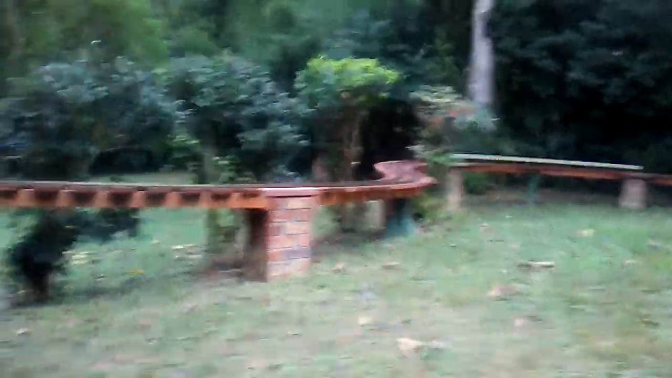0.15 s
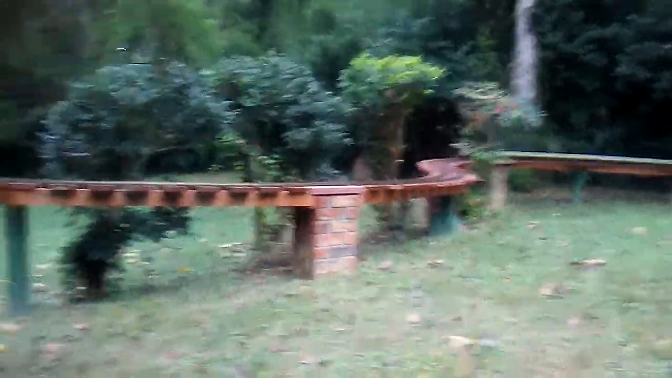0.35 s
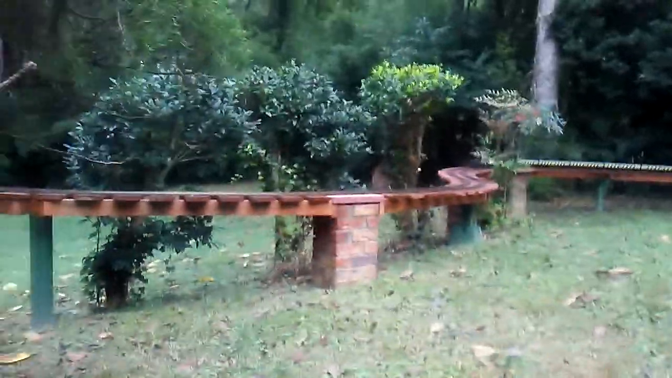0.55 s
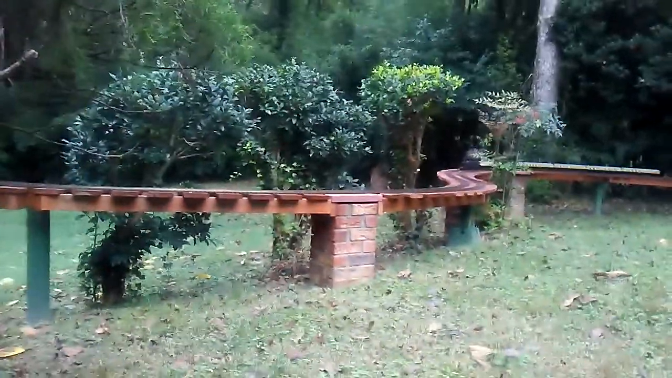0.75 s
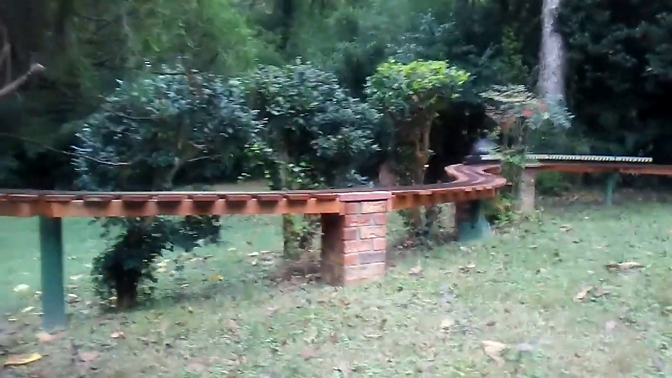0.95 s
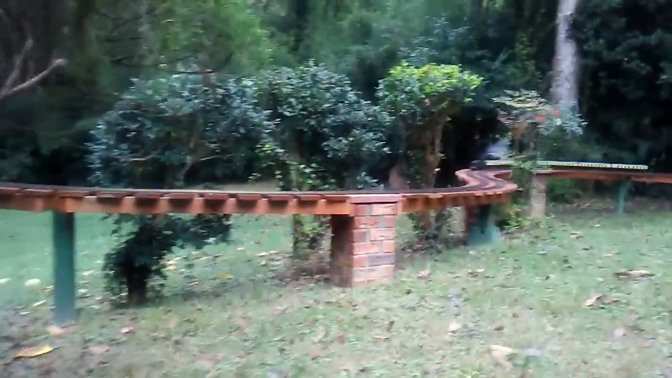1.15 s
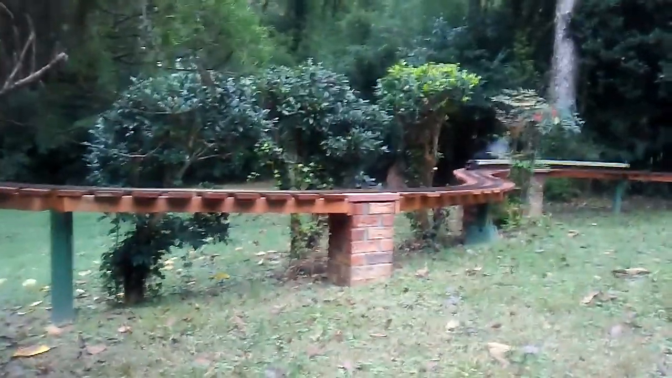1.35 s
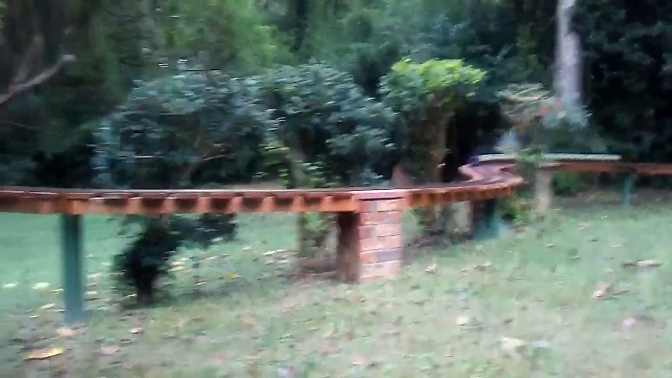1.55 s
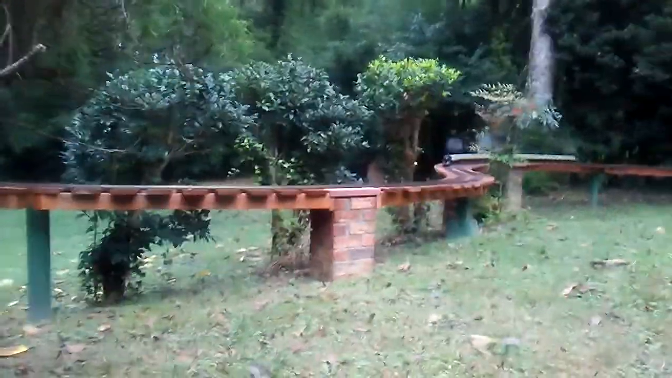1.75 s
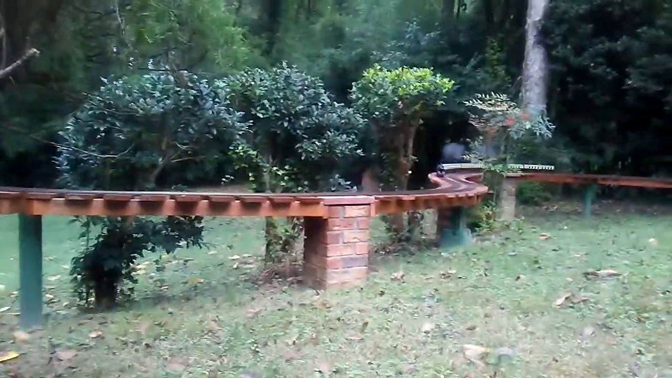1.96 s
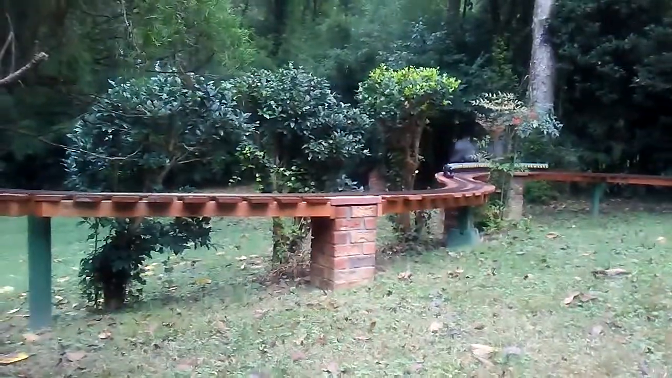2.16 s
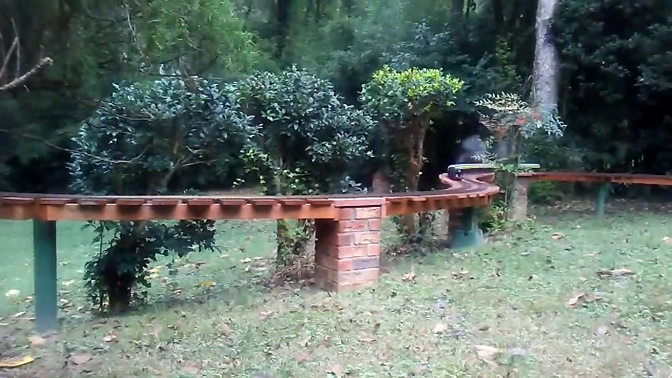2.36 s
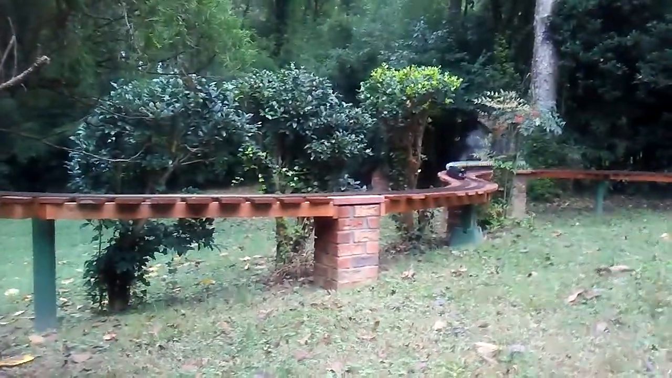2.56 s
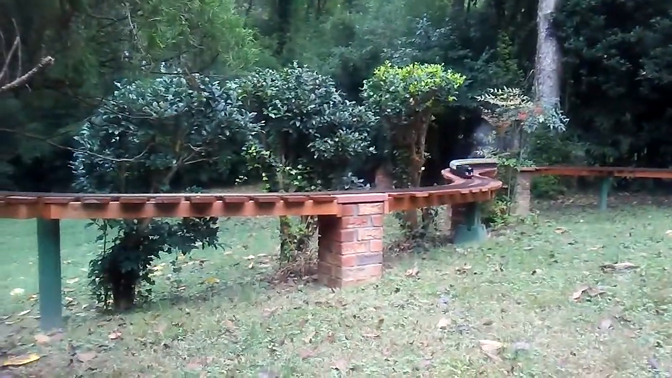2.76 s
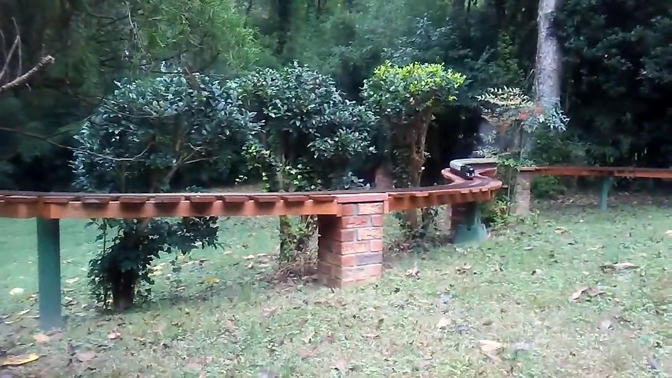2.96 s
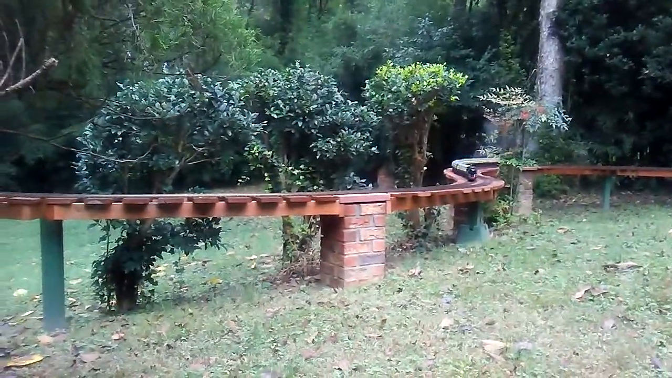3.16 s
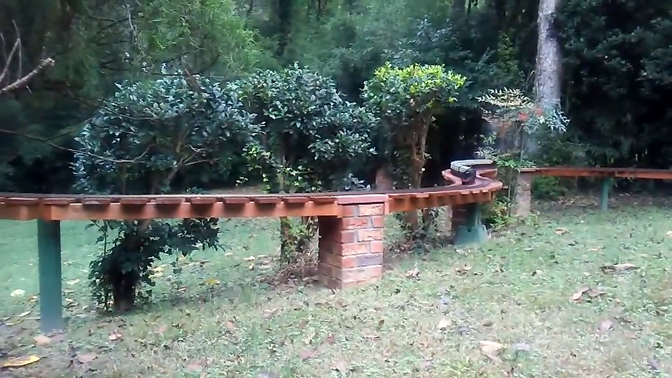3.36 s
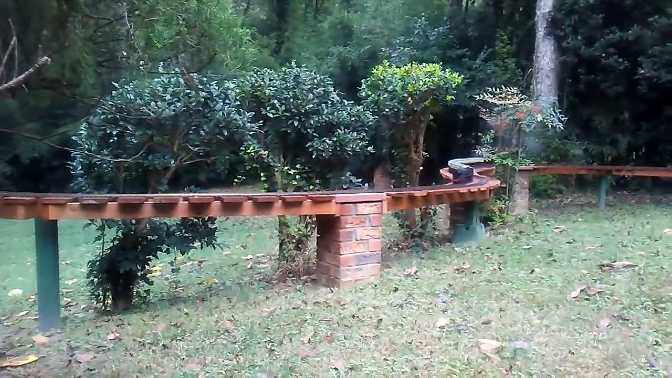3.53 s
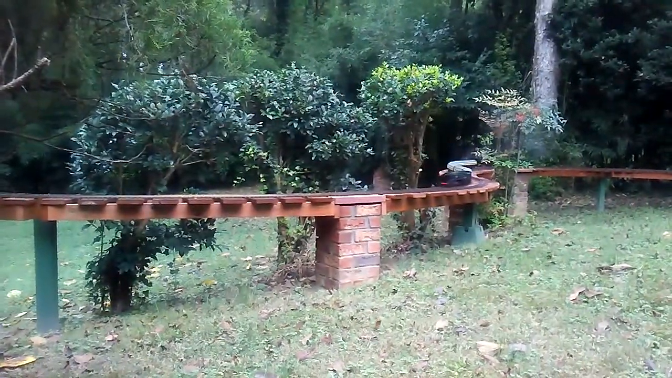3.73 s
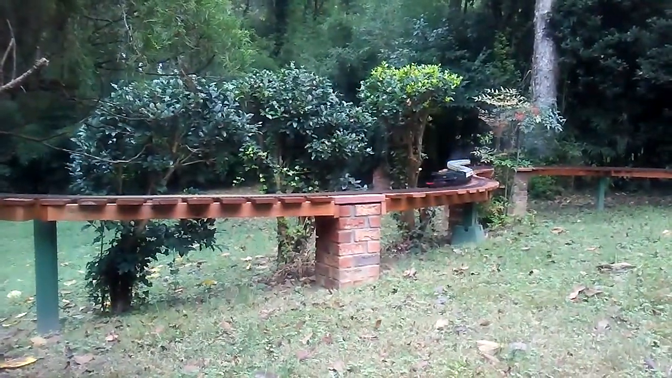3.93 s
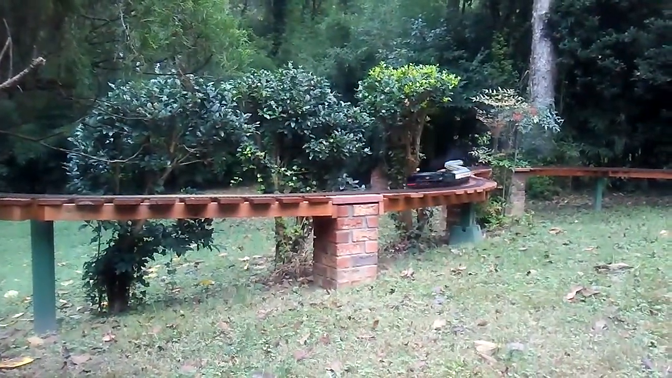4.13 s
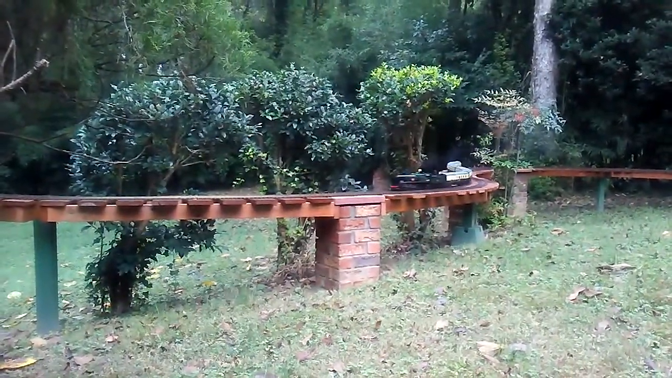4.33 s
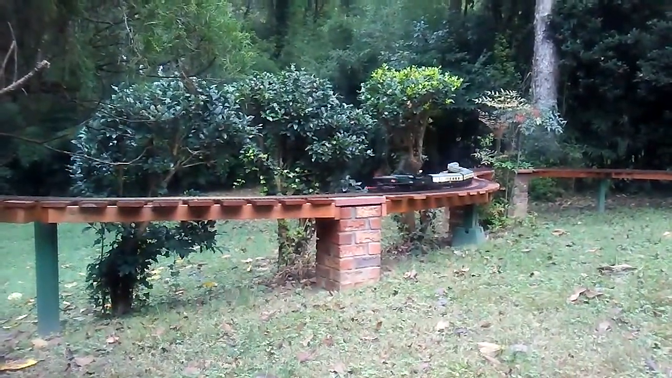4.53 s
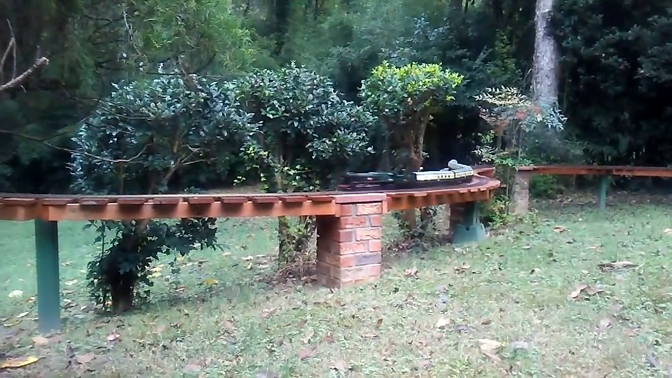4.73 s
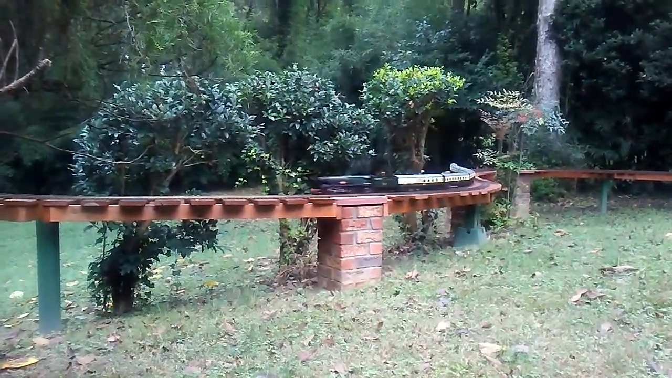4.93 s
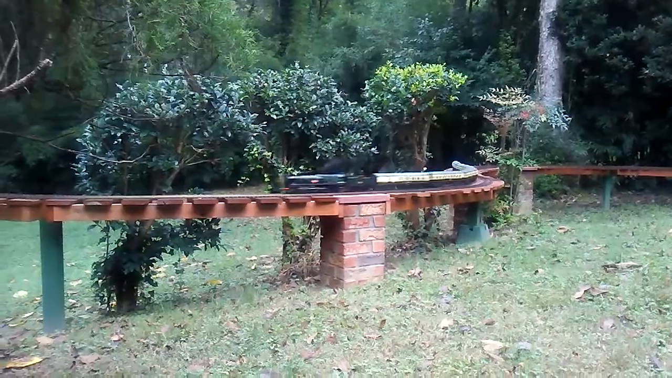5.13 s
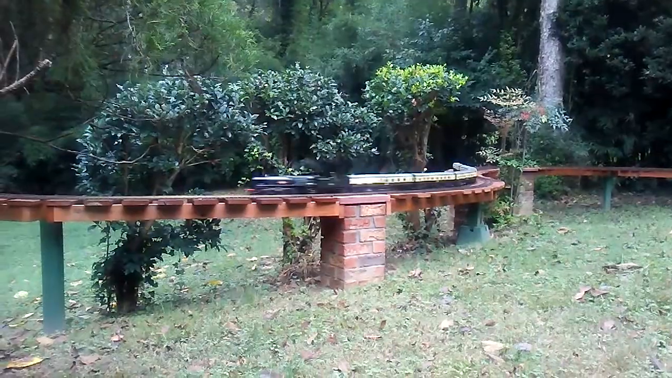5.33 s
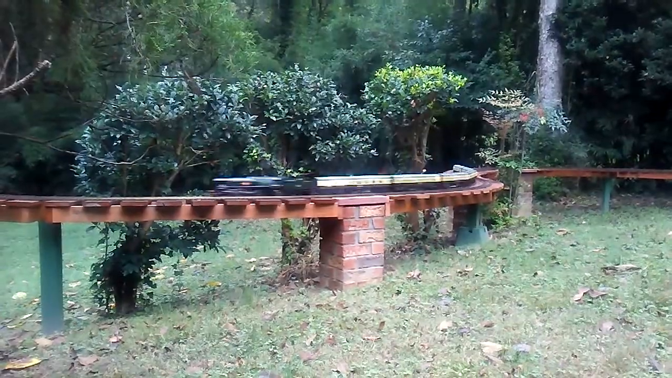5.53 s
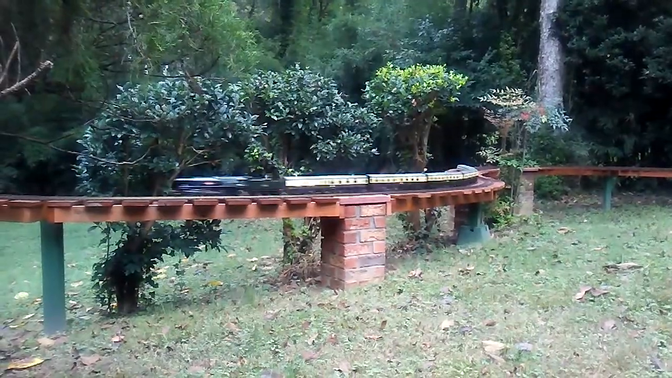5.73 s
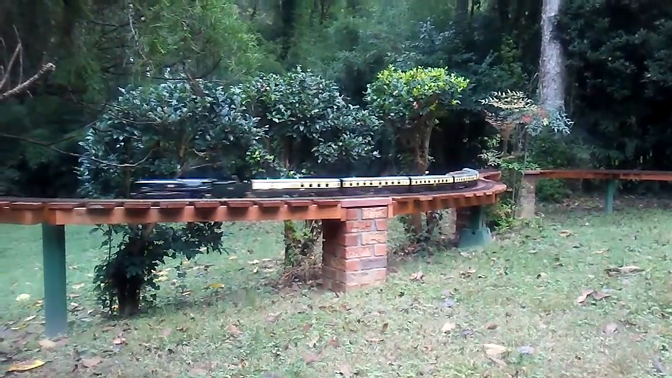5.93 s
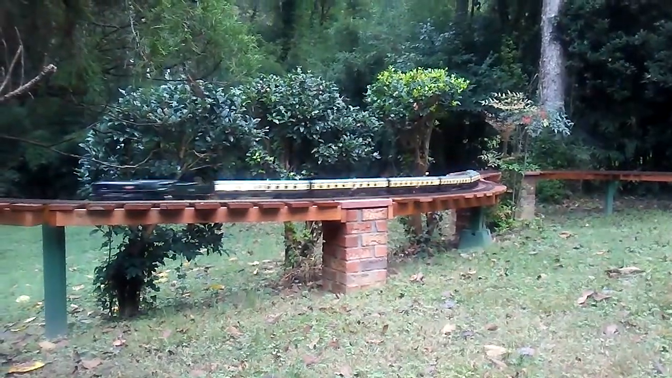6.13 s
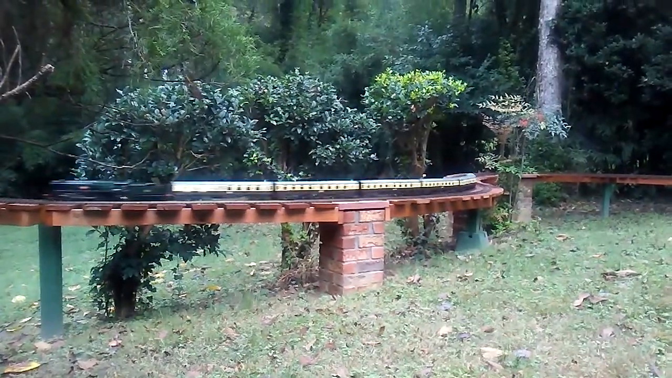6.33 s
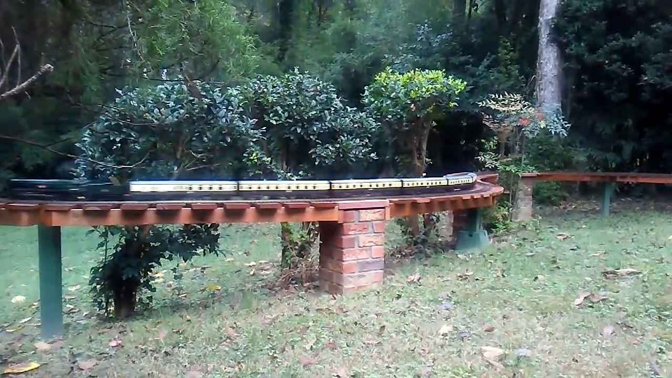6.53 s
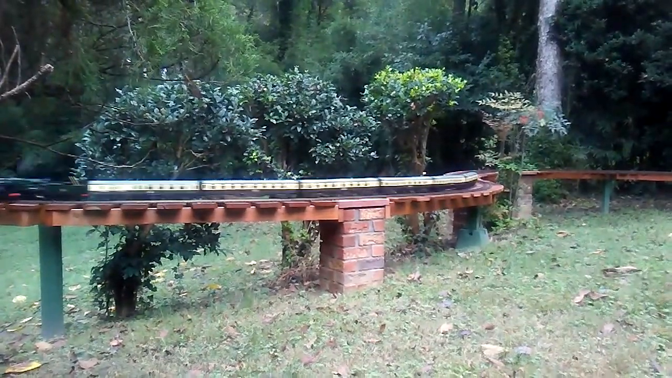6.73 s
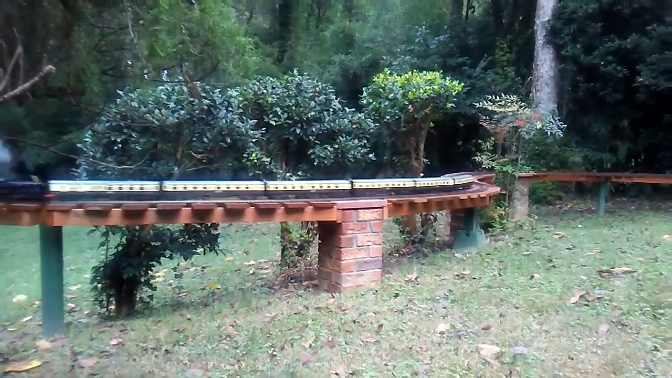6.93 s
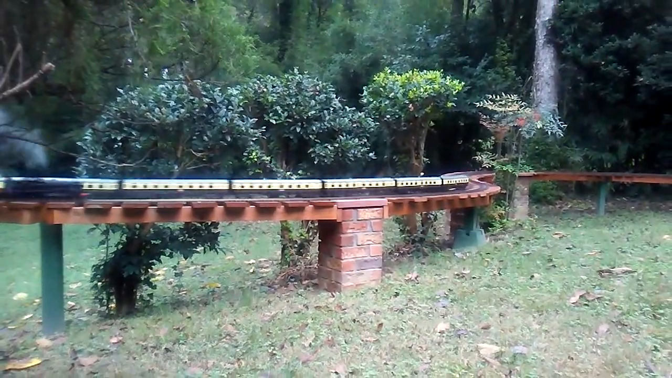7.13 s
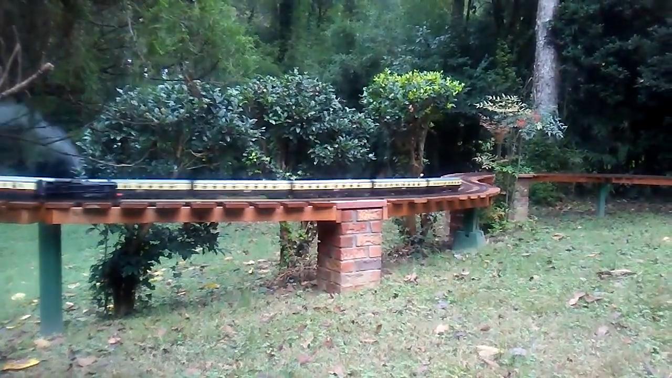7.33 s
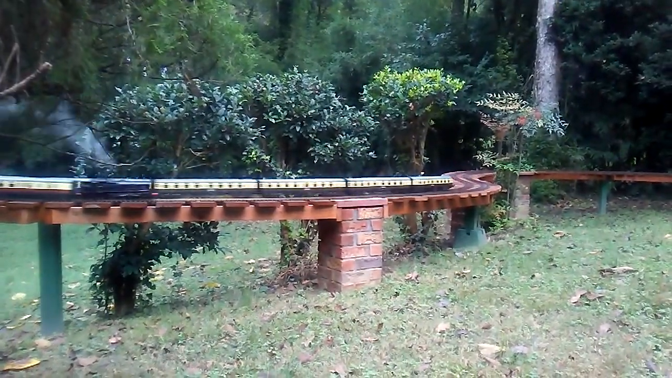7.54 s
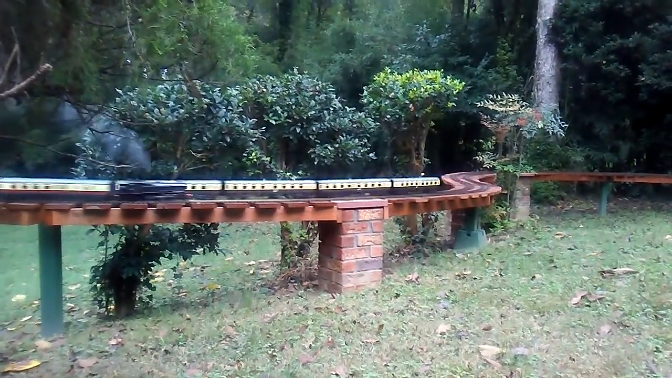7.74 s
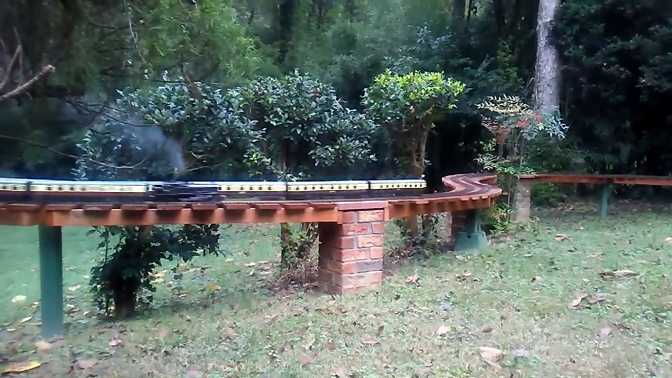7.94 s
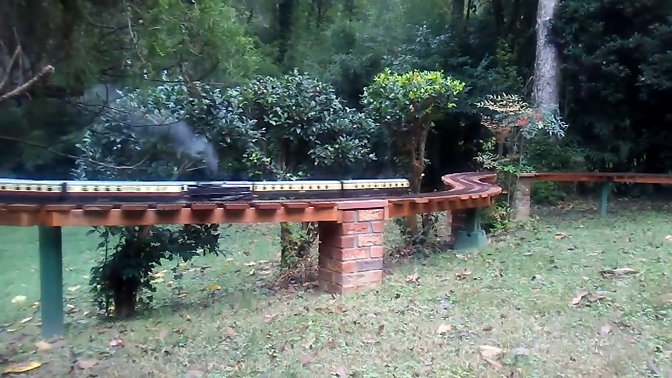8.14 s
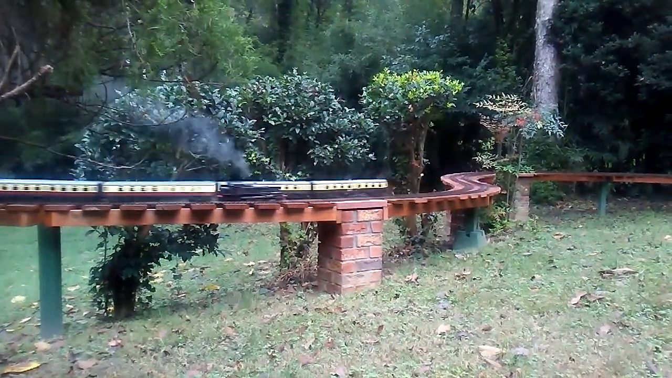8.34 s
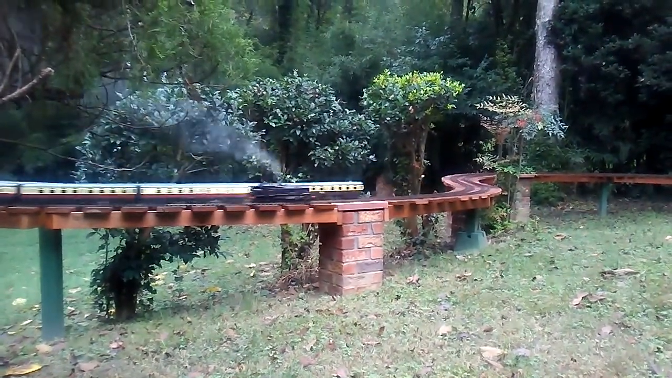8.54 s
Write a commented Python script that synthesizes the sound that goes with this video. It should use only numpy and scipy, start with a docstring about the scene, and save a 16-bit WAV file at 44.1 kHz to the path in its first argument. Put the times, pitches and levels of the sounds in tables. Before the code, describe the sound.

Outdoors in a garden, a fixed microphone hears a soft steady rush and a few faint bird notes. A miniature steam engine chuffs fast and thinly from behind bushes. From about three and a half seconds wheels clack over rail joints and couplings rattle, the wooden deck roars louder, then the engine passes close with sharp, wet popping beats and bright hiss.

```python
"""Live-steam model locomotive on a garden track

A model train comes close on a raised track, over an even garden rush, a faint far bird and low hums.
Four exhaust beats a wheel turn excite chimney modes, each with a wet spit and a gust of shaped noise.
Flow noise makes the steam's hiss and its puffs between beats; broad noise makes the deck roar.
Rail joints excite damped modes and chatter; gliding sines make the flange squeaks, bird and hums.
Shrubs echo the sharp sounds; the sound has two deep notches, and both channels are the same."""
import sys
import numpy as np
from scipy import signal
from scipy.fft import rfft, irfft, next_fast_len
from scipy.io import wavfile
from scipy.ndimage import uniform_filter1d

SR = 44100
rng = np.random.default_rng(int(sys.argv[2]) if len(sys.argv) > 2 else 0)


def int16_out(signal):
    """Quantize to a 16-bit WAV file."""
    q = np.round(np.clip(np.atleast_2d(signal).T, -1, 1) * 32767)
    wavfile.write(sys.argv[1], SR, q.astype(np.int16))


N = 378378
TIME = np.arange(N) / SR

# Levels are relative wherever a source has a level setting of its own.
# Noise spectrum of the garden: (frequency [Hz], relative density [dB per Hz])
GARDEN_SPECTRUM = [(30, -7), (60, -3), (100, -14.5), (200, -3), (400, -1.5), (600, 3), (850, 0.5),
                   (1300, 0), (1900, 1), (2600, -7), (3300, -3), (4000, -2.5), (5500, -22.5), (15500, -37)]
# Slurred notes of a far bird:
# (time [s], length [s], start frequency [Hz], end frequency [Hz], level [dB])
BIRD_NOTES = [(0.299, .07, 2800, 2560, -52), (0.555, 0.11, 2850, 2300, -47), (1.75, 0.11, 2096, 2050, -52),
              (1.98, 0.15, 2000, 2160, -54), (2.168, .12, 2065, 2200, -49.5),
              (2.867, 0.074, 2070, 2000, -50), (3.1, 0.11, 3000, 2710, -51)]
# Faint low hums:
# (time of peak [s], half length [s], frequency at peak [Hz], glide [Hz per s], level [dB])
LOW_HUMS = [(0.306, 1.2, 63.5, -1.5, -65), (7.25, 0.39, 85, 18, -62.5)]
# Nearness of the train: (time [s], rolling level [dB], share of near steam colour [0-1])
NEARNESS = [(0, -56.5, 0.44), (1.8, -56, 0), (2.6, -51.5, 0), (3.4, -48, 0.3), (4.6, -46, 0.53),
            (5.4, -44, 0.76), (6.1, -42.5, 0.84), (7, -42, 0.96), (7.8, -41, 1), (8.58, -41, 0.97)]
# Noise spectrum of the rolling train: (frequency [Hz], relative density [dB per Hz])
ROLLING_SPECTRUM = [(80, -47), (190, -11.5), (420, -13), (560, -7.5), (760, -3.5), (970, 2.5), (1130, -1.5),
                    (1330, -6), (1700, -4), (2050, -6), (2500, -23), (3300, -7), (4000, -12), (5500, -73)]
# Wheel flanges squeaking on the rail:
# (time [s], length [s], start frequency [Hz], settled frequency [Hz], level [dB])
FLANGE_SQUEAKS = [(4.8, .025, 6900, 7700, -46), (7.12, 0.034, 5870, 5590, -40.5)]
# Wheels striking rail joints:
# (time [s], clack level [dB], ring frequency [Hz], rattle level [dB], rattle decay [s])
RAIL_JOINTS = [(3.5015, -28.5, 1610, -57, .05), (3.5495, -24, 1600, -45, .04),
               (3.5912, -29, 1500, -51, .04), (3.777, -31, 1770, -44.5, 0.052),
               (3.8711, -27, 1690, -44.5, 0.1), (3.978, -31, 1700, -48, 0.061),
               (4.0741, -31, 1790, -45, 0.14), (4.4997, -23.5, 1670, -43.5, 0.049),
               (4.6, -29, 1560, -48, .06), (5.038, -31, 1760, -45.5, 0.42), (5.516, -29, 1670, -45, 0.11),
               (5.668, -30, 1710, -46, 0.15), (6.1285, -30, 1730, -47, 0.17),
               (6.674, -25.5, 1750, -44.5, 0.27), (7.23, -33, 1700, -42, 0.065)]
# Modes of a struck bogie, retuned at each joint: (frequency [Hz], level [dB], t60 [s])
BOGIE_MODES = [(1700, -0.5, 0.016), (1490, -18, 0.0033), (2000, -0.5, 0.0083), (3500, -28, 0.0028)]
# Colour of loose bogies and couplings: (frequency [Hz], level [dB])
CHATTER_SPECTRUM = [(900, -20), (1300, -10), (1520, 0.5), (1780, 3.0), (2150, -8), (2700, -17), (9000, -36)]
# Strength of the escaping steam: (time [s], level [dB])
STEAM_LEVEL = [(0.0, -58), (0.04, -54.5), (0.19, -64.5), (0.24, -60), (0.33, -70), (0.38, -61),
               (0.45, -58.5), (1.0, -56.5), (1.29, -66.5), (1.65, -56.5), (2.63, -68), (3.11, -60),
               (3.41, -60), (4.06, -53), (5.3, -50.5), (6.02, -45.5), (6.76, -45), (8.58, -46.5)]
# Noise spectra of far steam, near steam and valve puffs: (frequency [Hz], relative density [dB per Hz])
FAR_STEAM_SPECTRUM = [(2000, -21), (5000, -44), (6000, 0.5), (8600, 4.5), (9500, -0.5), (10300, -8),
                      (12300, -13), (14500, -11), (16000, -31)]
NEAR_STEAM_SPECTRUM = [(2000, -10.5), (5400, -12.5), (6050, -1), (6400, 1.5), (6850, 4.5), (7550, -4),
                       (8350, 2.5), (9400, -2.5), (10200, -1.5), (11600, -14), (13200, -15), (15600, -8.5)]
PUFF_SPECTRUM = [(3000, -49), (5250, -16.5), (5600, -1), (5900, 4), (6200, -2), (6700, -8), (10000, -30),
                 (16000, -44)]
# Speed of the driving wheels, which sags in the bend: (time [s], speed [turns per s])
WHEEL_SPEED = [(0, 5.315), (.55, 5.357), (1.5, 5.507), (3.1, 5.573), (4.2, 5.343), (5.5, 5.349),
               (6.8, 5.632), (8.58, 5.714)]
TURN_START_S = .1371  # when a wheel turn begins
# Four beats of a turn, uneven as the valves are set: (share of a turn [0-1], level [dB])
VALVE_TIMING = [(0, 0), (.249, -6.5), (.506, -4), (.742, -5)]
# Strength of the leading beat, muffled while the engine is behind the bushes: (time [s], level [dB])
EXHAUST_LEVEL = [(.14, -31.5), (.6, -39), (1.25, -29), (1.8, -37), (2.5, -32.5), (3.3, -33), (4.15, -37),
                 (4.9, -53), (5.3, -33.5), (6.7, -26), (7.2, -21), (7.45, -23.5), (8.58, -26)]
# Modes a beat excites in the chimney, retuned a little each time: (frequency [Hz], level [dB], t60 [s])
CHIMNEY_MODES = [(3182, 22, 0.015), (3100, -3, 0.0078), (3650, -18, 0.013)]
# Noise spectra of the wet spit and the gust after a beat: (frequency [Hz], relative density [dB per Hz])
SPIT_SPECTRUM = [(6000, -25), (11000, -7), (12300, -7), (13500, -10), (15600, 4)]
GUST_SPECTRUM = [(2000, -23), (2700, -15), (3100, -9), (3600, 11), (4000, -3), (5500, -25)]
# Overall frequency response, with two deep notches: (frequency [Hz], gain [dB])
OVERALL_RESPONSE = [(20, -34), (34, -27), (50, -4.5), (100, 5), (113, -5), (121, -26), (129, -7), (155, 0),
                    (4020, 0), (4300, -15.5), (4450, -33), (4850, -22.5), (5250, -8), (5650, -1.5)]
EDGE_HZ = 15780  # upper band limit


def gain_of(db):
    """Level law: twenty decibels are a tenfold amplitude."""
    return 10 ** (np.asarray(db) / 20)


def evened(x):
    """Normalization: scales a signal to an rms of 1."""
    return x / np.sqrt(np.mean(x ** 2) + 1e-20)


def curves(rows):
    """Linear interpolation: each column of a timed table at every sample."""
    s, *columns = np.transpose(rows)
    return [np.interp(TIME, s, column) for column in columns]


def coloured(x, spectrum):
    """Linear filtering: shapes a spectrum by gains joined on a log-frequency axis."""
    hz, db = np.transpose(spectrum)
    size = next_fast_len(N + SR // 2)
    bins = np.fft.rfftfreq(size, 1 / SR)
    gains = gain_of(np.interp(np.log(bins + 1), np.log(hz), db))
    return irfft(rfft(x, size) * gains, size)[:N]


def rush(spectrum, patchy_db):
    """Turbulent noise of rms 1: small patches of time and frequency swell and fade."""
    cells = signal.stft(rng.standard_normal(N), nperseg=512)[2]
    patches = uniform_filter1d(rng.standard_normal(cells.shape), size=8, axis=1)
    patches = evened(uniform_filter1d(patches, size=7, axis=0))
    noise = signal.istft(cells * gain_of(patchy_db * patches), nperseg=512)[1][:N]
    return evened(coloured(noise, spectrum))


def wander(hz):
    """Low-pass noise: a slow random drift of rms 1, up to about hz."""
    bins = np.fft.rfftfreq(N, 1 / SR)
    return evened(irfft(rfft(rng.standard_normal(N)) / (1 + (bins / hz) ** 4), N))


def add(mix, s, sound):
    """Superposition: mixes a sound in at a time in seconds."""
    if s >= 0:
        part = mix[round(s * SR):][:len(sound)]
        part += sound[:len(part)]


def tone(pitch):
    """Phase is the running integral of frequency: a sine that follows a pitch curve in Hz."""
    return np.sin(2 * np.pi * np.cumsum(pitch) / SR)


def ring(modes, rise, stretch):
    """Modal decay: damped sines after a soft blow (rise in s), with a peak of 1."""
    t = TIME[:SR // 20]
    x = np.zeros(len(t))
    for hz, db, t60 in modes:
        x += gain_of(db - 60 * t / t60) * np.sin(2 * np.pi * hz * stretch * t)
    x = x * (1 - np.exp(-(t / rise) ** 2))
    return x / abs(x).max()


def garden(level_db=-45.0):
    """Diffuse background: shaped noise holds an even level."""
    return gain_of(level_db) * rush(GARDEN_SPECTRUM, patchy_db=0.88)


def bird(level_db=0):
    """Frequency glide: each faint note slurs from one pitch to another and wavers."""
    out, waver = np.zeros(N), wander(70)
    for s, length, start_hz, end_hz, db in BIRD_NOTES:
        pitch = np.linspace(start_hz, end_hz, round(length * SR))
        pitch = pitch * (1 + 0.017 * waver[round(s * SR):][:len(pitch)])
        add(out, s, gain_of(db + level_db) * signal.windows.tukey(len(pitch), .5) * tone(pitch))
    return out


def hums(waver_hz=0.73, waver_db=0.5):
    """Modulated tones: faint hums swell, glide and fade; one climbs as the train comes by."""
    out = np.zeros(N)
    for s, half_length, hz, glide_hz_per_s, db in LOW_HUMS:
        pitch = hz + glide_hz_per_s * (TIME - s) + waver_hz * wander(7.2)
        swell = gain_of(db + waver_db * wander(8)) / (1 + ((TIME - s) / half_length) ** 2)
        out += swell * tone(pitch)
    return out


def shrubs(x, wet_db=-9, t60=0.09):
    """Scattering: bushes, deck and lawn return a short, thin echo of sparse decaying taps."""
    t = TIME[:SR // 4]
    struck = (rng.random(len(t)) < 2000 / SR) * (t > .002)  # 2000 taps per s after 2 ms
    taps = rng.standard_normal(len(t)) * struck * gain_of(-60 * t / t60)
    return x + gain_of(wet_db) * signal.fftconvolve(x, taps / np.linalg.norm(taps))[:N]


def rolling(level_db=0, shake_db=0.26):
    """Structure-borne sound: wheels on the rails make the wooden deck roar."""
    level = level_db + curves(NEARNESS)[0] + shake_db * wander(30)
    return gain_of(level) * rush(ROLLING_SPECTRUM, patchy_db=0.8)


def squeaks(settle_s=0.0074):
    """Friction tone: a wheel flange squeaks briefly on the rail, settling in pitch."""
    out = np.zeros(N)
    for s, length, start_hz, hz, db in FLANGE_SQUEAKS:
        t = np.arange(0, length, 1 / SR)
        pitch = hz + (start_hz - hz) * np.exp(-t / settle_s)
        add(out, s, gain_of(db) * signal.windows.tukey(len(t), .3) * tone(pitch))
    return out


def wheels(clack_db=-1.0, rattle_db=-1, knocks_per_s=450, swell_s=0.047):
    """Impact excitation: joints ring a bogie, and loose bogies and couplings chatter and die away."""
    clacks, shaking = np.zeros(N), np.zeros(N)
    for s, db, hz, shake_db, decay_s in RAIL_JOINTS:
        blow = ring(BOGIE_MODES, rise=0.00075, stretch=hz / BOGIE_MODES[0][0])
        add(clacks, s, gain_of(db) * blow)
        width_s = np.where(TIME < s, swell_s, decay_s)
        shaking += gain_of(shake_db) * np.exp(-((TIME - s) / width_s) ** 2)
    knocks = rng.uniform(-0.7, 1, N) * (rng.random(N) < knocks_per_s / SR)
    chatter = evened(coloured(knocks, CHATTER_SPECTRUM))
    return gain_of(clack_db) * clacks + gain_of(rattle_db) * shaking * chatter


def steam(times, hiss_db=2.0, puff_db=8.5, far_loss_db=7, puff_phase=0.81, puff_width=0.13,
          flutter_db=0.72, far_flutter_db=0.9, uneven_db=1.3):
    """Jet noise: a fluttering hiss steadies and changes colour when near; valves puff between beats."""
    level_db, near = curves(STEAM_LEVEL)[0], np.clip(curves(NEARNESS)[1], 0, 1)
    far_hiss = np.sqrt(1 - near) * rush(FAR_STEAM_SPECTRUM, patchy_db=1.4)
    near_hiss = np.sqrt(near) * rush(NEAR_STEAM_SPECTRUM, patchy_db=0.9)
    unsteady_db = flutter_db * wander(45) + far_flutter_db * (1 - near) * wander(20)
    hiss = gain_of(hiss_db + unsteady_db) * (far_hiss + near_hiss)
    stroke = np.interp(TIME, times, np.arange(len(times)))  # counts up by one from beat to beat
    off_centre = (stroke - puff_phase + .5) % 1 - .5  # phase and width are shares of a stroke
    valve = np.exp(-(off_centre / puff_width) ** 2 / 2)
    strength_db = puff_db - far_loss_db * (2.5 - near) + uneven_db * wander(22)
    puffs = gain_of(strength_db) * valve * rush(PUFF_SPECTRUM, patchy_db=2.0)
    return gain_of(level_db) * (hiss + puffs)


def turns():
    """Rotation: wheel speed integrates to the turns made at every sample."""
    made = np.cumsum(curves(WHEEL_SPEED)[0]) / SR
    return made - np.interp(TURN_START_S, TIME, made)


def beats(lead_spread_db=1.0, weak_spread_db=1.9):
    """Valve timing: a turn gives one strong beat and three weaker, less steady ones."""
    made = turns()
    share, accent_db = np.transpose(VALVE_TIMING)
    whole = np.arange(-1, np.ceil(made[-1]))[:, None]
    spread_db = np.where(np.arange(len(share)) == 0, lead_spread_db, weak_spread_db)
    place = whole + share
    db = accent_db + spread_db * rng.standard_normal(place.shape)
    heard = (place > made[0]) & (place < made[-1])
    times = np.interp(place[heard], made, TIME)
    return times, db[heard] + np.interp(times, TIME, curves(EXHAUST_LEVEL)[0])


def exhaust(times, levels, level_db=-3, spit_db=-14.5, spit_s=.003, wet_spread_db=2.0,
            gust_db=-12.0, gust_s=0.0032):
    """Pulsed resonance: each beat is a spit of wet steam, a pop in the chimney and a short gust."""
    pops, spits, gusts = np.zeros((3, N))
    t = TIME[:SR // 20]
    for s, db, (pitch, wetness) in zip(times, levels, rng.standard_normal((len(times), 2))):
        # the spit leads the pop by 1.5 ms
        add(spits, s - .0015, gain_of(db + wet_spread_db * wetness) * np.exp(-t / spit_s))
        add(pops, s, gain_of(db) * ring(CHIMNEY_MODES, rise=0.00055, stretch=1 + .018 * pitch))
        add(gusts, s, gain_of(db) * np.exp(-t / gust_s))
    # the spit carries only a short way
    spray = spits * rush(SPIT_SPECTRUM, patchy_db=0.0) * curves(NEARNESS)[1]
    blast = gusts * rush(GUST_SPECTRUM, patchy_db=3.0)
    return gain_of(level_db) * pops + gain_of(spit_db) * spray + gain_of(gust_db) * blast


def scene():
    """Superposition: the train over the garden, the same in both channels."""
    times, levels = beats()
    sharp_sounds = bird() + squeaks() + wheels() + exhaust(times, levels)
    mono = garden() + hums() + rolling() + steam(times) + shrubs(sharp_sounds)
    return np.array([mono, mono])


def record(dry):
    """Linear filtering: two deep notches, then the band limit."""
    heard = np.array([coloured(channel, OVERALL_RESPONSE) for channel in dry])
    low_pass = signal.firwin(1023, EDGE_HZ, window=("kaiser", 9), fs=SR)
    return signal.oaconvolve(heard, low_pass[None], "same")


dry = scene()
out = record(dry)
int16_out(out)
```